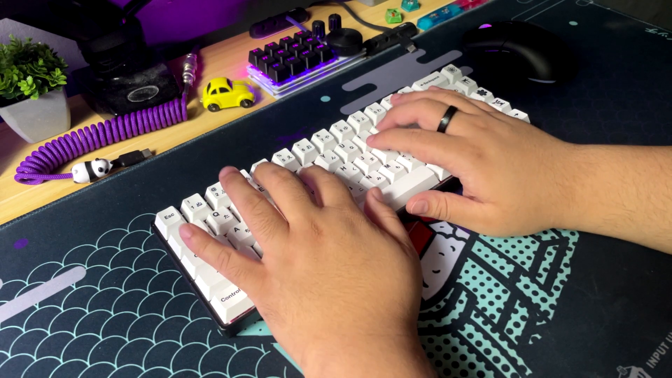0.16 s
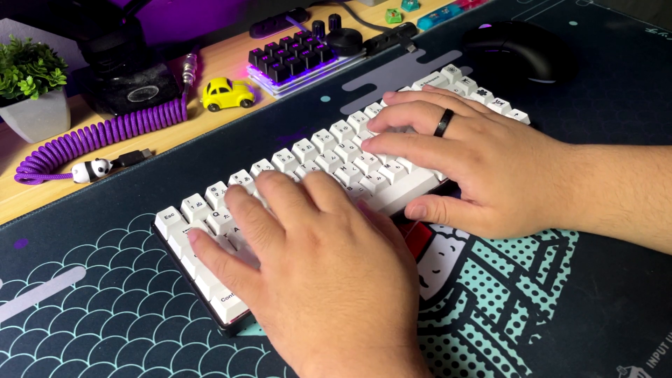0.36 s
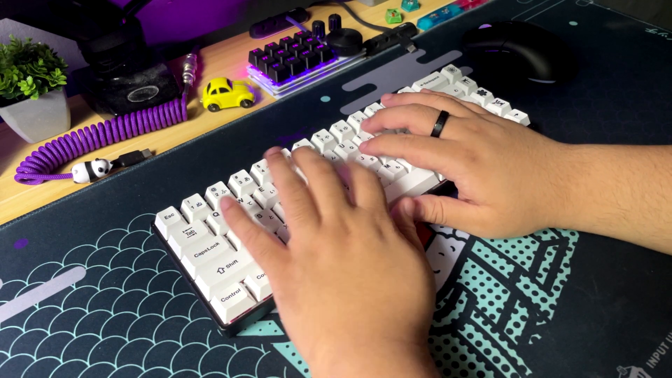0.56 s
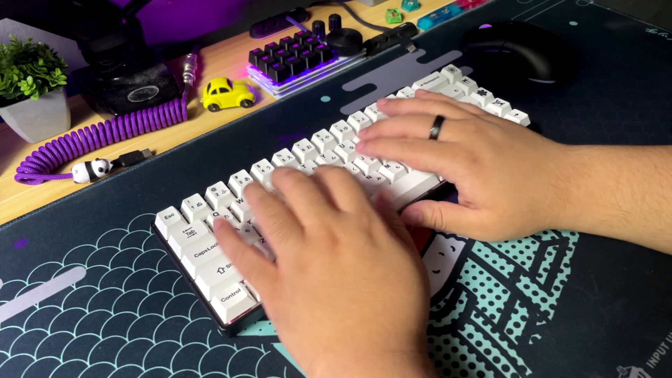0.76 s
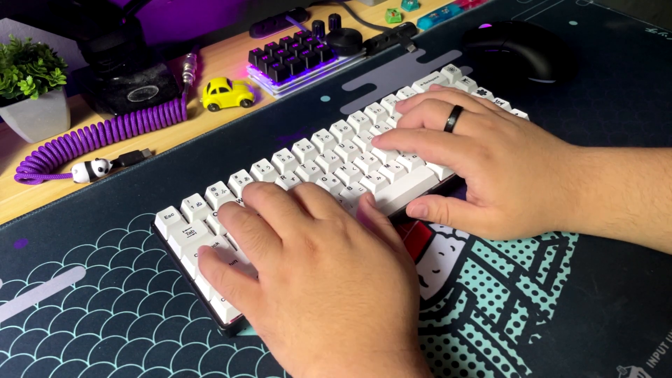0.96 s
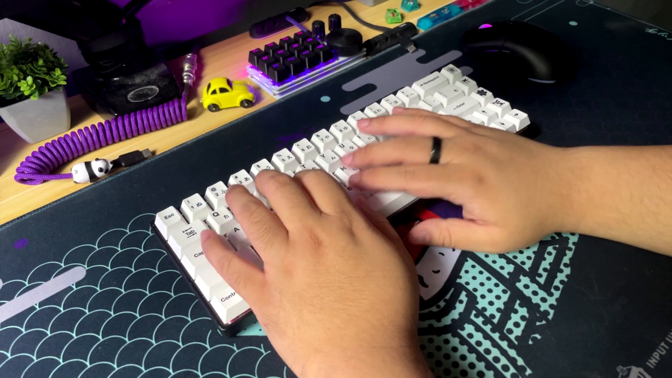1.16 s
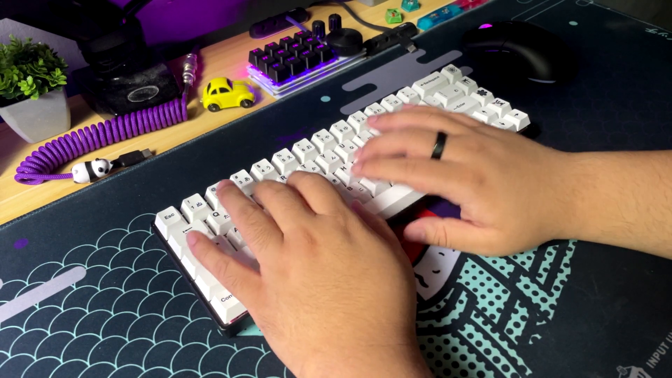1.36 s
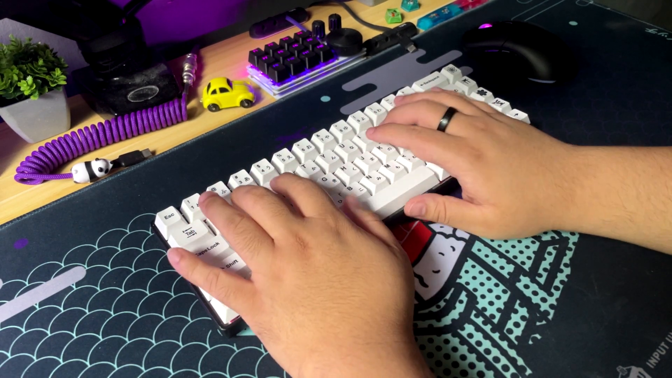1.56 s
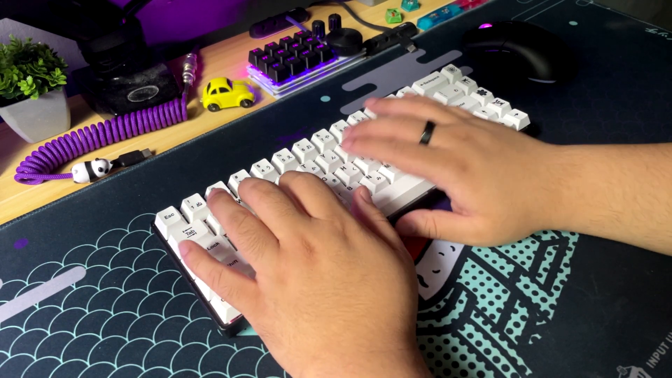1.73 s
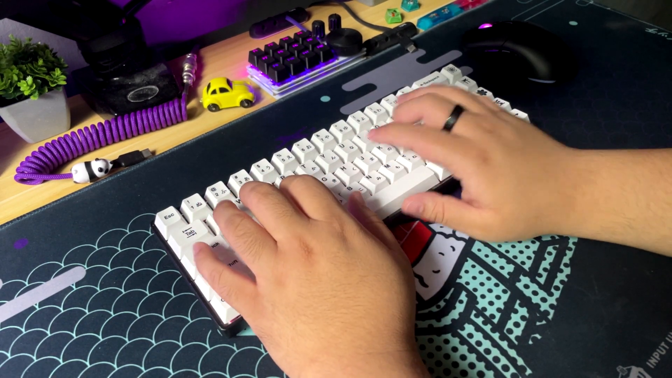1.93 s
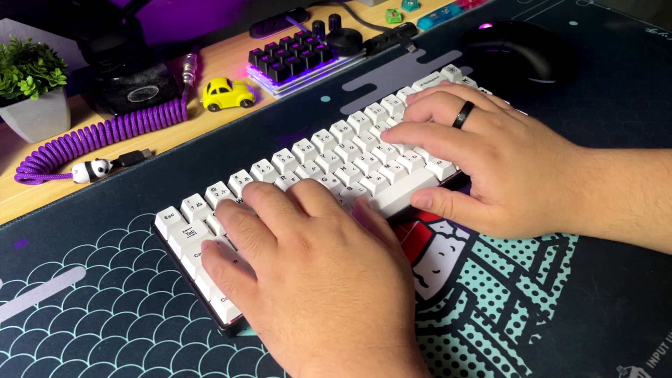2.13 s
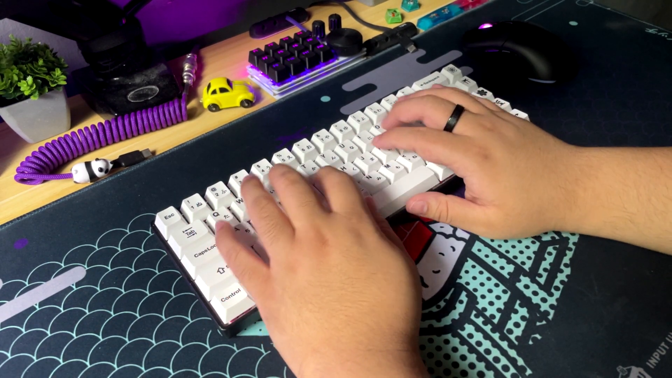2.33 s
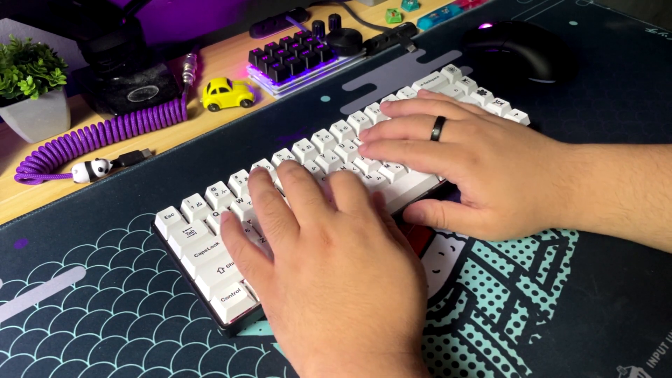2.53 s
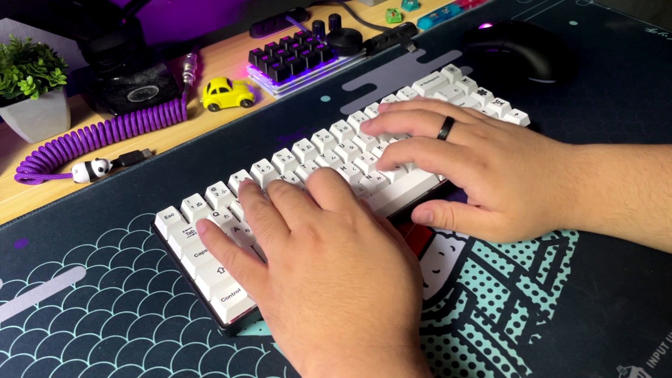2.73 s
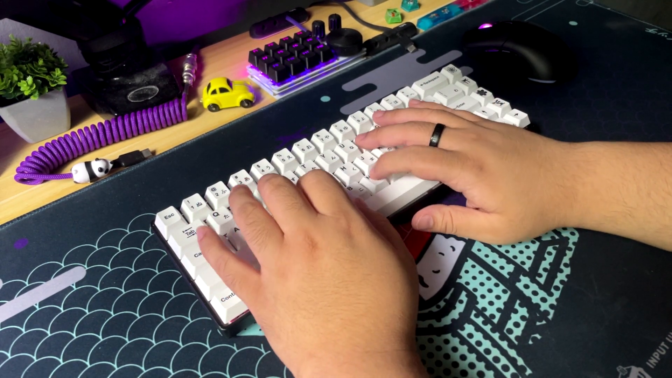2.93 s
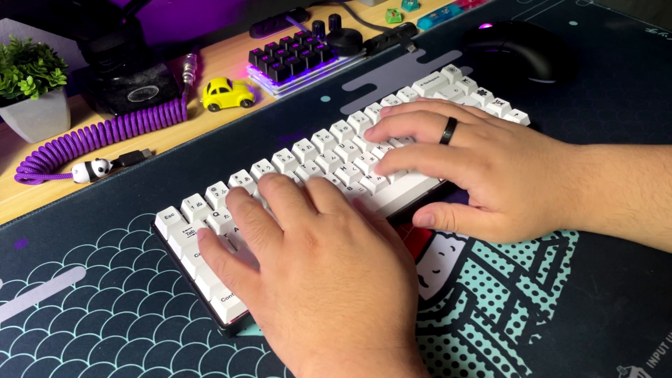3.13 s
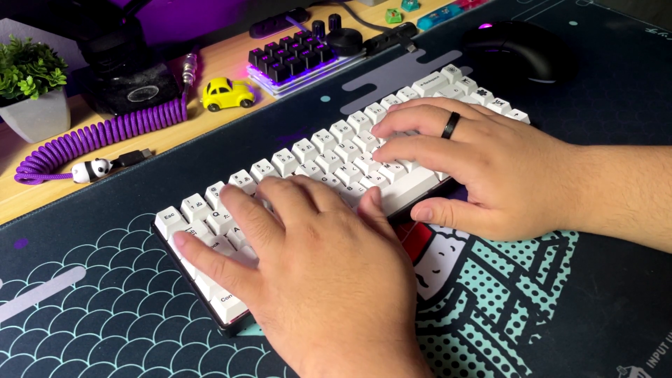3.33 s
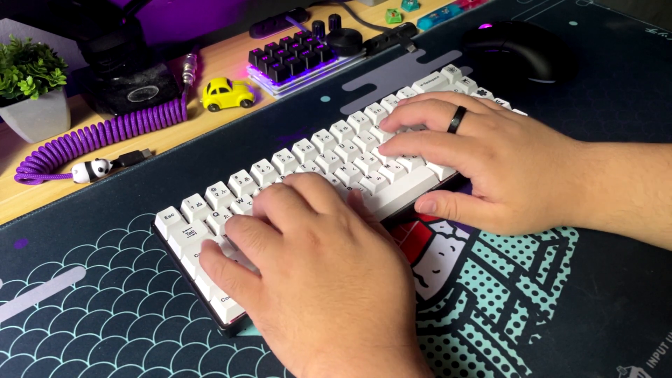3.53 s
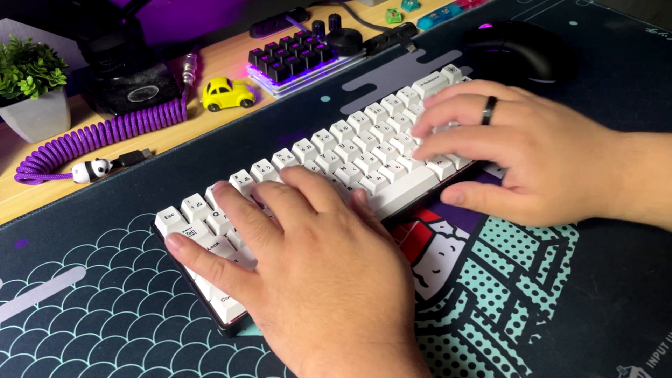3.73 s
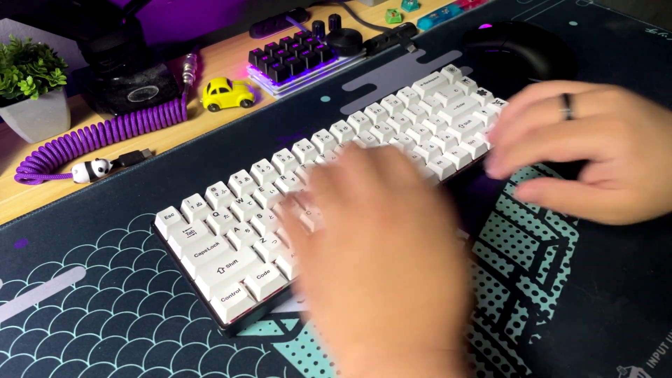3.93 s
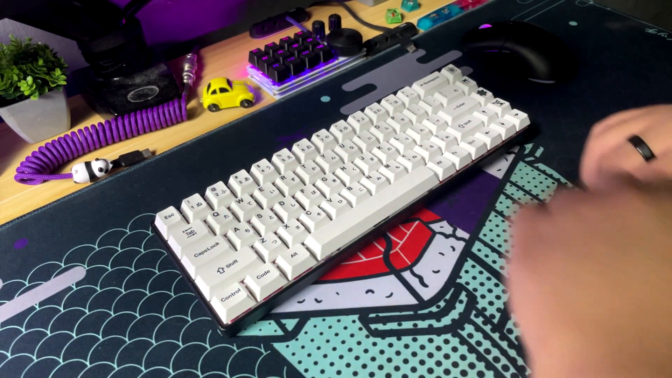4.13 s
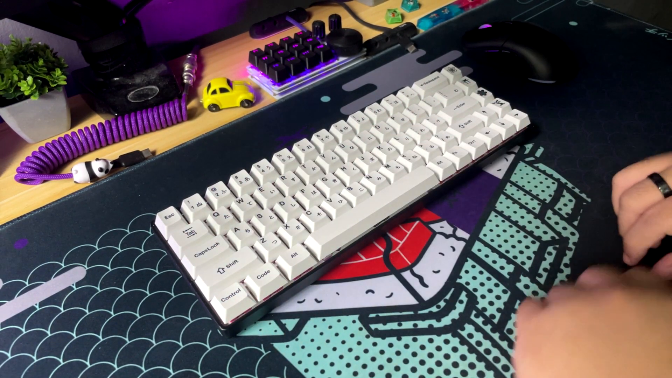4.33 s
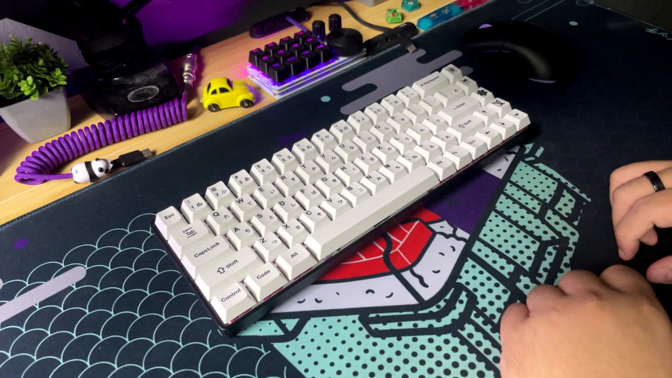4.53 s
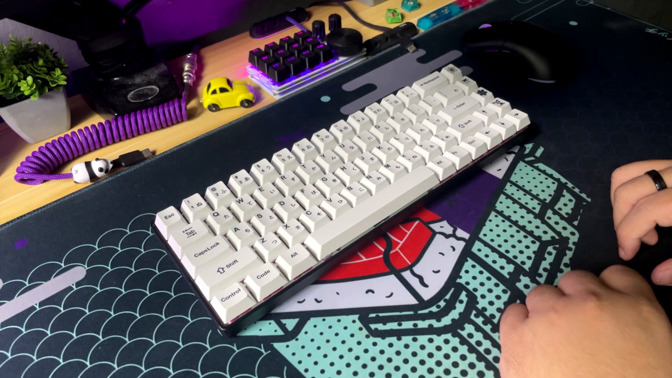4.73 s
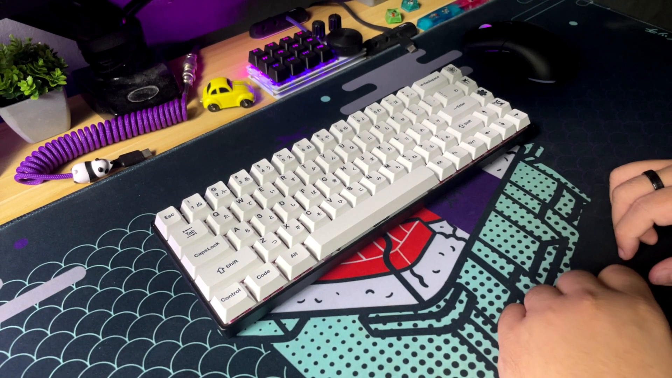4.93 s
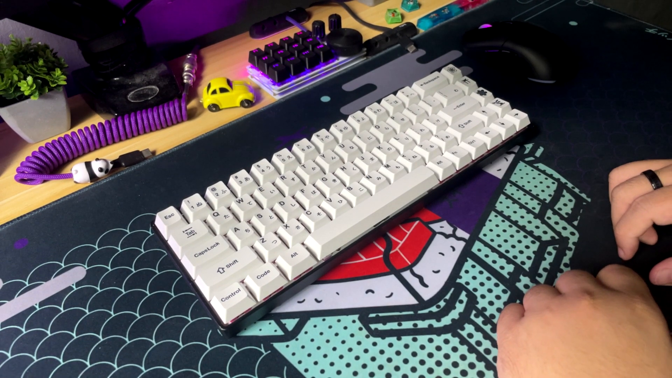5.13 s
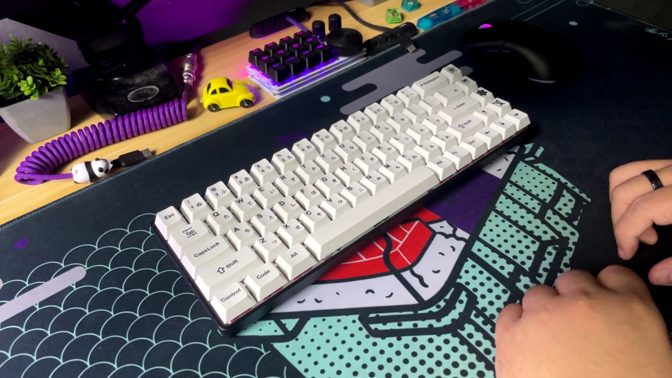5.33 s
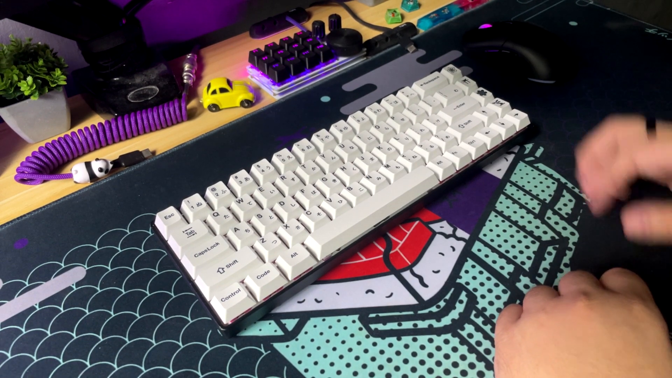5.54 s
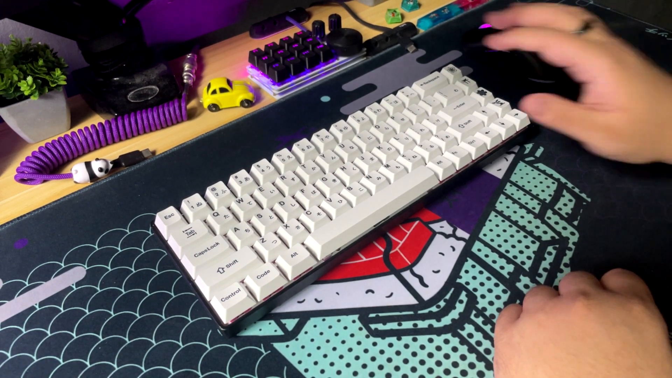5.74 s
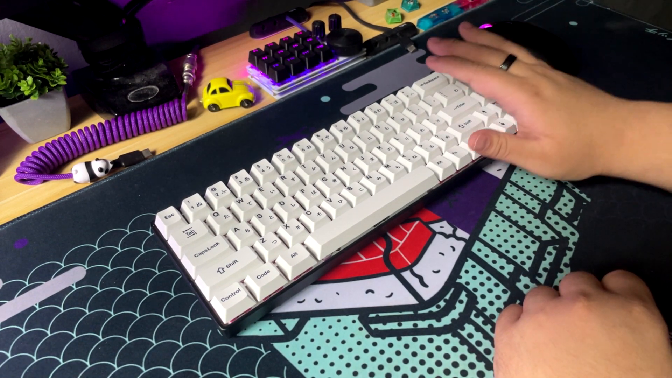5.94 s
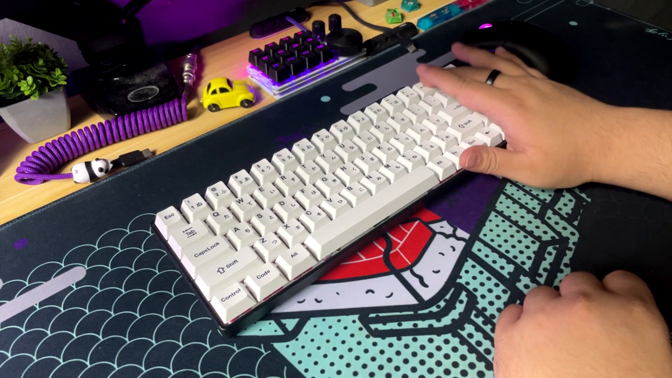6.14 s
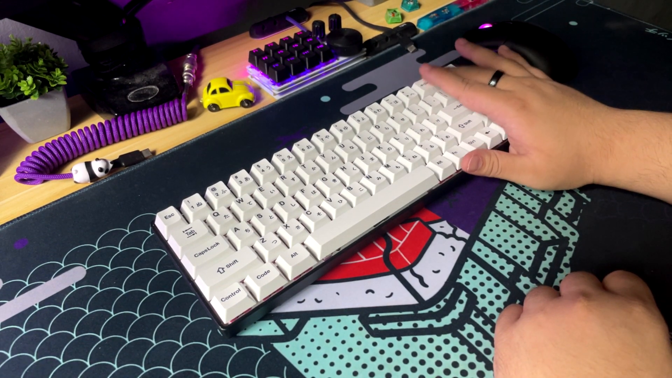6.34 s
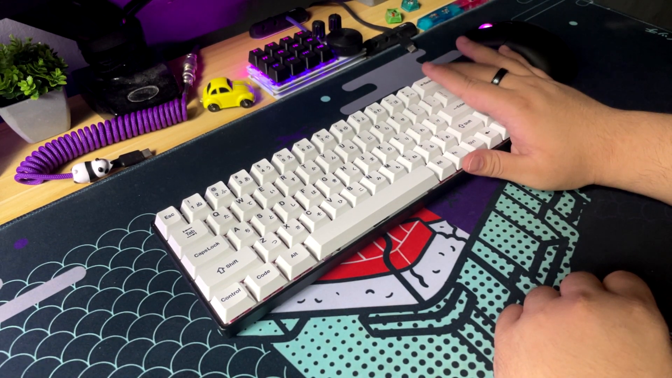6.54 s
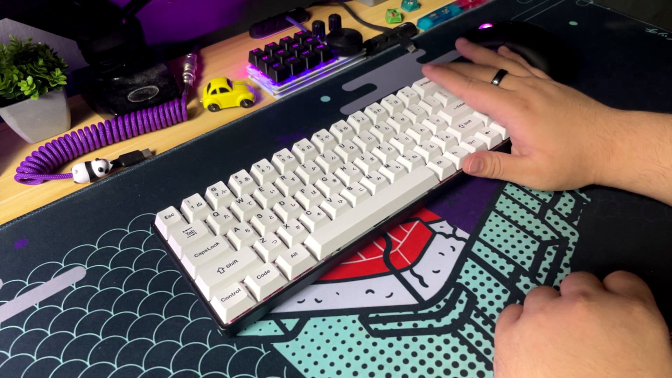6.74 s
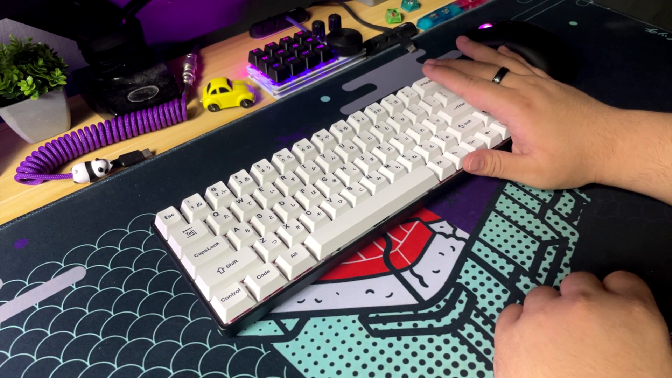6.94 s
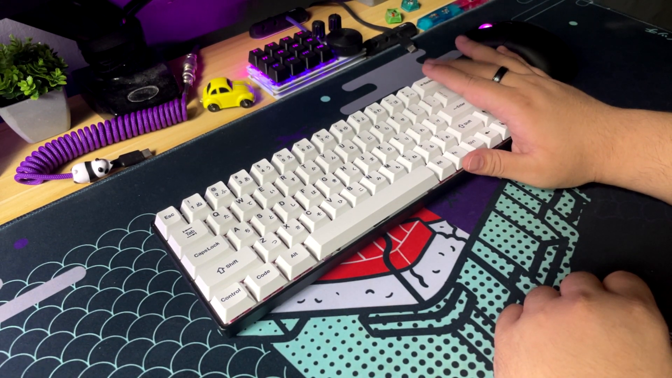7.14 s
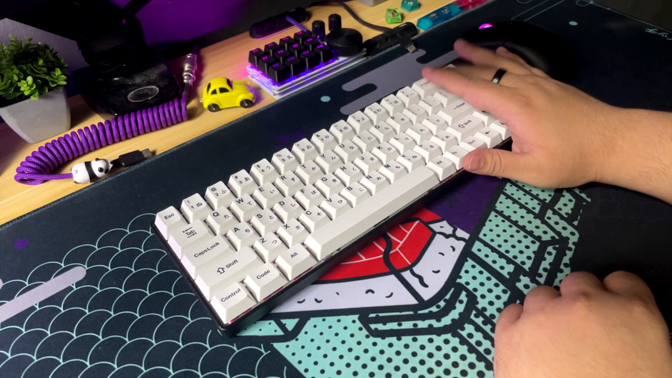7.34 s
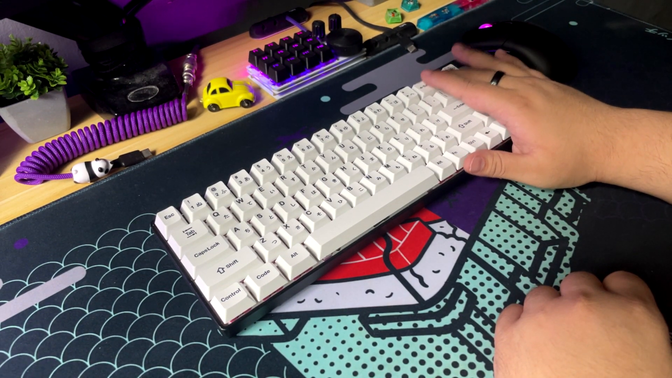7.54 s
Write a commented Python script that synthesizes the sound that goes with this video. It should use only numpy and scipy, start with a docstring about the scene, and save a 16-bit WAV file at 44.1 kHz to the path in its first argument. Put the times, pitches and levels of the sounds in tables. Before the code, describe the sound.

Muted mechanical keyboard clacks run quickly, stop with a soft desk thud, and after a pause a single key taps steadily.

```python
"""Typing on a damped mechanical keyboard

Fast typing on a keyboard that lies on a desk mat in a small quiet room. Each stroke is an impact that
excites the damped modes of plate, keycap and switch stem; its force also drives the low modes of the
desk, most strongly under the space bar. The forearms come down on the desk, all is still, and then one
finger taps backspace nine times."""
import sys
import numpy as np
from scipy import signal
from scipy.io import wavfile

SR = 44100
rng = np.random.default_rng(int(sys.argv[2]) if len(sys.argv) > 2 else 0)


def unload_wav(signal):
    """Save mono or channel-first audio to the path in sys.argv[1] as 16-bit WAV at rate SR, clipped to [-1, 1]."""
    wavfile.write(
        sys.argv[1],
        SR,
        np.round(np.clip(np.atleast_2d(signal).T, -1, 1) * 32767).astype(np.int16),
    )


N = 339129
RING_TIME = np.arange(SR // 2) / SR
FIRM_DB = -11.5   # reference force: that of a firm stroke

# Modes of a keycap. Each row: multiple of the cap's pitch, level in dB, t60 in seconds.
CAP_MODES = [(1, -1.5, 0.0086), (1.17, 2, 0.0068), (1.45, -2.5, 0.0041), (1.72, -6.5, 0.006),
             (1.97, -18.5, 0.007)]
# Modes of a switch stem. Each row: frequency in Hz, level in dB, t60 in seconds.
STEM_MODES = [(4900, -11.5, 0.0088), (6700, -15, 0.0034), (10130, -1.5, .006), (10615, -5, 0.0099)]
# Letter keys landing. Each row: start in seconds, force in dB, pitch of the plate under the key in Hz.
KEY_PRESSES = [(.0671, -21, 1070), (0.2754, -20.5, 1020), (0.5968, -17.5, 800), (.795, -19.5, 1175),
               (0.8643, -23.5, 1045), (0.9845, -24.5, 845), (1.1133, -19.5, 776), (1.1766, -14, 790),
               (1.2871, -27, 820), (1.366, -17, 843), (1.4829, -18.5, 1080), (1.5139, -27, 853),
               (1.6922, -22.5, 820), (1.8936, -18, 1172), (1.9966, -20.5, 1060), (2.3109, -17.5, 1135),
               (2.3753, -13, 795), (2.4864, -28.5, 745), (2.5219, -26, 905), (2.5832, -22.5, 830),
               (2.6077, -32, 1000), (2.809, -24, 840), (2.87, -19.5, 895), (3.2301, -15.5, 802),
               (3.3605, -17, 870), (3.4408, -22.5, 822), (3.5476, -19, 924), (3.621, -13.5, 802)]
# Letter keys springing back. Each row: start in seconds, force in dB.
KEY_RETURNS = [(.254, -30), (0.378, -26), (.686, -31.5), (.897, -33.5), (1.0552, -30), (1.233, -30.5),
               (1.5786, -34), (1.775, -31), (1.9883, -31), (2.117, -32), (2.174, -41.5), (2.4029, -30.5),
               (2.5126, -33), (2.545, -33), (2.6566, -36.5), (2.7215, -34.5), (2.961, -26.5),
               (3.0278, -35.5), (3.0506, -25), (3.3386, -24.5), (3.5125, -25), (3.694, -28.5)]
# The space bar landing under the thumb, and once springing back with almost no thump.
# Each row: start in seconds, force in dB, level of the desk thump in dB.
SPACE_STROKES = [(0.1526, -30.5, -19.5), (0.4896, -32.5, -42.5), (0.9443, -30.5, -22), (1.2639, -29, -24.5),
                 (2.0587, -35, -27), (2.6851, -30, -19.5)]
# Backspace taps. Each row: start in seconds, force in dB, hold in seconds, force of the return in dB.
BACKSPACE_TAPS = [(5.9686, -19, 0.1, -27.5), (6.1656, -23, .0831, -27.5), (6.3473, -24.5, 0.08, -26),
                  (6.5275, -24, .0875, -31), (6.708, -27.5, .079, -29), (6.8909, -25.5, 0.084, -28.5),
                  (7.077, -25.5, 0.085, -25.5), (7.2574, -24.5, .0832, -28), (7.4436, -25.5, 0.088, -32)]


def from_db(db):
    """Amplitude grows tenfold for every 20 dB."""
    return 10 ** (np.asarray(db) / 20)


def at_hz(points, hz):
    """Interpolation of a curve on a logarithmic frequency axis."""
    points = np.array(points)
    return np.interp(np.log(hz), np.log(points[:, 0]), points[:, 1])


def cut(x, hz, kind):
    """A maximally flat low-, high- or band-pass filter with skirts of 12 dB per octave."""
    sections = signal.butter(2, np.clip(hz, 10, SR * 9 / 20), kind, fs=SR, output="sos")
    return signal.sosfilt(sections, x)


def add(track, start_s, sound):
    """Superposition: a sound adds to the track from its start on."""
    start = max(round(start_s * SR), 0)
    track[start:start + len(sound)] += sound[:N - start]


def decay(t, t60):
    """Exponential damping: the level falls 60 dB in t60 seconds."""
    return np.exp(-np.log(1000) * t / t60)


def noise_bands(size):
    """Half-octave bands of noise as (centre in Hz, samples); neighbours are uncorrelated."""
    edges = 22 * 2 ** (np.arange(20) / 2)
    white = rng.standard_normal((2, size))
    return [(np.sqrt(low * high), cut(white[k % 2], [low, high], "band"))
            for k, (low, high) in enumerate(zip(edges, edges[1:]))]


def coloured_noise(spectrum):
    """Weighted bands sum to stationary noise of the given spectrum and unit rms."""
    noise = sum(from_db(at_hz(spectrum, hz)) * band for hz, band in noise_bands(N))
    return noise / noise.std()


def wavering(depth_db, per_s):
    """Random amplitude modulation: a gain that wanders about 1."""
    steps = rng.standard_normal(2000)
    return from_db(depth_db * np.interp(np.arange(N) / SR * per_s, np.arange(len(steps)), steps))


def ring(modes, pitch=1, spread_db=1, size=4000):
    """Free vibration is a sum of damped modes; each blow shares its force among them differently."""
    hz, db, t60 = np.array(modes, float).T[:, :, None]
    t = RING_TIME[:size]
    strength = from_db(db + spread_db * rng.standard_normal(db.shape))
    return np.sum(strength * decay(t, t60) * np.sin(2 * np.pi * hz * pitch * t), axis=0)


def thump(modes, push_s):
    """Gradual excitation: heavy modes swell while flesh presses on, then ring out."""
    return ring(modes, spread_db=2.5, size=len(RING_TIME)) * (1 - np.exp(-RING_TIME / push_s))


def contact(x, hardness_hz):
    """A contact of finite duration spreads the blow and so acts as a low-pass, 3 dB down at hardness_hz."""
    t = np.arange(-24, 25) / SR
    force = np.exp(-2 * (np.pi * hardness_hz * t) ** 2 / np.log(2))
    return np.convolve(x, force / force.sum(), "same")


def rattle(x, level_db, span_s, bounces=5):
    """Inelastic bounces of a loose part repeat the blow, on average ever more weakly."""
    fractions = rng.uniform(.15, 1, bounces)
    gains = from_db(level_db) * rng.standard_normal(bounces) * (1 - fractions)
    out = x.copy()
    for fraction, gain in zip(fractions, gains):
        lag = 1 + int(fraction * span_s * SR)
        out[lag:] += gain * x[:-lag]
    return out


def room_tone(level_db=-70):
    """The background of a quiet room is stationary noise, weighted to low frequencies."""
    # Each row: frequency in Hz, relative spectral density in dB.
    spectrum = [(25, -10.5), (60, -9), (130, 0.5), (250, -2), (450, -0.5), (700, -13), (1000, -8),
                (1600, -17), (2400, -39.5), (4000, -40), (16000, -52.5)]
    return from_db(level_db) * coloured_noise(spectrum)


def hands(lead_s=.02, swell_s=0.038):
    """Fingers rock the case (rumble) and rub the caps (rustle); incoherent noises add in power."""
    # Spectra of the two noises. Each row: frequency in Hz, relative spectral density in dB.
    rumble_spectrum = [(25, -9), (48, -9), (68, 4.5), (90, -2), (180, 2.5), (300, -13.5), (450, -8),
                       (700, -16.5), (1500, -61)]
    rustle_spectrum = [(300, -10), (700, 5), (1300, 8.5), (2300, -15.5), (4000, -18), (7000, -33.5),
                       (10500, -28), (15000, -47)]
    # The fading tail of a keystroke at the very start; then hands leaving the keys, settling on the mat
    # and reaching back. Each row: middle in seconds, length in seconds, rumble in dB, rustle in dB.
    swells = [(-0.011, 0.14, -37, -36), (3.633, 0.95, -49, -69.5), (4.035, 0.23, -67.5, -73),
              (4.458, 0.61, -65.5, -75), (4.856, 0.87, -79, -74), (5.405, 0.43, -63.5, -77.5),
              (5.891, 0.26, -59.5, -83)]
    finger_power, t = np.zeros(N), np.arange(N) / SR
    stroke_swell = RING_TIME / swell_s * np.exp(1 - RING_TIME / swell_s)
    for start_s, *_ in KEY_PRESSES + KEY_RETURNS + SPACE_STROKES + BACKSPACE_TAPS:
        add(finger_power, start_s - lead_s, stroke_swell)
    rumble = from_db(-53.5) * np.sqrt(finger_power)
    rustle = from_db(-57.5) * np.sqrt(finger_power)
    for middle_s, length_s, rumble_db, rustle_db in swells:
        swell = np.cos(np.pi * np.clip((t - middle_s) / length_s, -.5, .5)) ** 2
        rumble = np.hypot(rumble, from_db(rumble_db) * swell)
        rustle = np.hypot(rustle, from_db(rustle_db) * swell)
    rumble *= wavering(depth_db=1.5, per_s=25) * coloured_noise(rumble_spectrum)
    rustle *= wavering(depth_db=2.5, per_s=22) * coloured_noise(rustle_spectrum)
    return rumble + rustle


def touches(cap_hz=2157, travel_s=.014, touch_db=-27.5):
    """Light impacts: a finger meets the loose cap before the key lands; at times a stem ticks alone."""
    # Half-pressed switches letting go. Each row: start in seconds, level in dB.
    stem_ticks = [(.779, -52), (2.564, -46), (3.135, -47.5), (3.152, -41.5)]
    out = np.zeros(N)
    for landing_s, force_db, _ in KEY_PRESSES:
        tick = contact(ring(CAP_MODES, cap_hz * rng.uniform(0.92, 1.25)), hardness_hz=4500)
        start_s = landing_s - travel_s * rng.uniform(.5, 2.7)
        add(out, start_s, from_db(force_db + touch_db) * rattle(tick, level_db=-0.5, span_s=0.0059))
    for start_s, db in stem_ticks:
        add(out, start_s, from_db(db) * rattle(ring(STEM_MODES), level_db=-1, span_s=0.0043))
    return out


def key_stroke(force_db, plate_hz, cap_hz, snap_db=0):
    """One impact excites plate, cap and stem; each grows with the force by its own power law."""
    # Each row: multiple of the plate's pitch under the key, level in dB, t60 in seconds.
    plate_modes = [(.83, 4.5, 0.027), (1, 7.5, 0.019), (1.34, 2.5, 0.021), (1.76, -10, 0.034)]
    over_db = force_db - FIRM_DB
    stiffness_db = -9.5 * np.log2(plate_hz / 868)   # a stiffer spot rings higher and moves less
    plate_db = -20 + 0.75 * over_db + stiffness_db
    stem_db = -23.5 + 1.35 * over_db + snap_db   # the snap grows faster than the force
    # A gentle blow squashes the pad less, lasts longer and sounds duller.
    firmness = from_db(0.22 * min(over_db + 6.5, 0))
    own_cap_hz = cap_hz * (1 + .045 * rng.standard_normal())
    plate = from_db(plate_db) * contact(ring(plate_modes, plate_hz), hardness_hz=2400)
    cap = from_db(force_db) * contact(ring(CAP_MODES, own_cap_hz), hardness_hz=4200 * firmness)
    stem = from_db(stem_db) * contact(ring(STEM_MODES, spread_db=4.5), hardness_hz=11400)
    return plate + rattle(cap + stem, level_db=-2.0, span_s=.0035)


def letter_keys(return_plate_hz=890, plate_spread=0.21):
    """A key strikes at both ends of its travel; on the return the cap rings lower, the stem snaps less."""
    out = np.zeros(N)
    for start_s, force_db, plate_hz in KEY_PRESSES:
        add(out, start_s, key_stroke(force_db, plate_hz, cap_hz=2157))
    for start_s, force_db in KEY_RETURNS:
        plate_hz = return_plate_hz * (1 + plate_spread * rng.standard_normal())
        add(out, start_s, key_stroke(force_db, plate_hz, cap_hz=1770, snap_db=-12.5))
    return out


def desk(follow_through_s=.016):
    """Structure-borne sound: the force of each press passes through case and mat into the desk."""
    # Desk modes under the keyboard's middle and under its corner.
    # Each row: frequency in Hz, level in dB, t60 in seconds.
    middle_modes = [(69, -8.5, 0.2), (114, -9, 0.087), (183, -1, 0.12), (287, -25, 0.53), (382, -15, 0.094),
                    (449.4, -14.5, 0.11)]
    corner_modes = [(68.4, -6.5, 0.33), (129, -8.5, 0.17), (195, 5, 0.062), (246, -4.5, 0.16),
                    (336, -14.5, .15), (405, -13, 0.11)]
    out = np.zeros(N)
    for click_s, force_db, _ in KEY_PRESSES:   # the finger's weight arrives after the click
        weight = from_db(-31 + .5 * (force_db - FIRM_DB))
        add(out, click_s + follow_through_s, weight * thump(middle_modes, push_s=0.025))
    for start_s, _, thump_db in SPACE_STROKES:
        add(out, start_s, from_db(thump_db + 1) * thump(middle_modes, push_s=0.0085))
    for start_s, *_ in BACKSPACE_TAPS:
        add(out, start_s, from_db(-34.5) * thump(corner_modes, push_s=0.002))
    return out


def wide_key(strokes, modes, pad_hz, wire_db, wire_s, spread_db=.5):
    """A stabilised key rings in the same modes each time; soft contact dulls it and its wire chatters."""
    out = np.zeros(N)
    for start_s, force_db, hardness_hz in strokes:
        padded = contact(ring(modes, spread_db=spread_db), pad_hz)
        blow = cut(padded, hardness_hz, "low")
        add(out, start_s, from_db(force_db) * rattle(blow, wire_db, wire_s))
    return out


def space_bar(hardness_hz=13000):
    """The impact of the long bar excites its modes and sets its wire bouncing."""
    # Each row: frequency in Hz, level in dB, t60 in seconds.
    bar_modes = [(445, 0.5, 0.024), (654, 9, .018), (770, -0.5, 0.031), (1220, -0.5, 0.024),
                 (2280, 7.5, 0.0035), (2600, -2, 0.0097), (3530, -11, .008), (4600, 0.5, 0.0062),
                 (5320, -2.5, 0.014), (7560, -3.5, 0.0057), (10000, 1, 0.0026)]
    strokes = [(start_s, force_db, hardness_hz) for start_s, force_db, _ in SPACE_STROKES]
    return wide_key(strokes, bar_modes, pad_hz=10000, wire_db=-1, wire_s=.006, spread_db=2.5)


def fingertips(count=16):
    """Mechanical play: caps nudged during the typing rattle on their stems without going down."""
    out = np.zeros(N)
    typing_end_s = KEY_RETURNS[-1][0]
    for moment, force, pitch in rng.random((count, 3)):
        tick = contact(ring(CAP_MODES, 1700 + 1100 * pitch), hardness_hz=4480)
        wobble = rattle(tick, level_db=0.0, span_s=0.0074)
        add(out, moment * typing_end_s, from_db(-48 + 2.7 * force) * wobble)
    return out


def forearms(skid_s=0.022, settle_s=0.095, settle_db=-16):
    """A soft, heavy impact drives the desk's low modes; skin makes friction noise as it skids to rest."""
    # Arms and wrists landing. Each row: start in seconds, thump in dB, brushing in dB.
    landings = [(4.21, -45, -70), (4.245, -30.5, -42.5), (5.73, -57, -84)]
    # Modes of the desk edge. Each row: frequency in Hz, level in dB, t60 in seconds.
    edge_modes = [(33.3, -8, 0.5), (119.6, 7.5, 0.16), (150.8, 12.5, 0.13), (284, -12, 0.3),
                  (425, -23, 0.5)]
    # Skin brushing the edge. Each row: frequency in Hz, relative spectral density in dB.
    brush_spectrum = [(300, -2.5), (850, -14.5), (1450, 11), (2000, -15.5), (2800, -30), (5000, -53),
                      (9000, -56), (15000, -69)]
    thumps, friction = np.zeros(N), np.zeros(N)
    skid = np.exp(-RING_TIME / skid_s) + from_db(settle_db) * np.exp(-RING_TIME / settle_s)
    onset = 1 - np.exp(-RING_TIME / 0.00076)
    for start_s, thump_db, brush_db in landings:
        add(thumps, start_s, from_db(thump_db) * thump(edge_modes, push_s=0.012))
        add(friction, start_s, from_db(brush_db) * skid * onset)
    return thumps + friction * coloured_noise(brush_spectrum)


def hand_lift(start_s=5.3, length_s=0.2, level_db=-66):
    """Sliding friction makes a faint band of noise as the right hand leaves the mat."""
    swell = np.sin(np.pi * np.clip((np.arange(N) / SR - start_s) / length_s, 0, 1)) ** 2
    swish = cut(rng.standard_normal(N), [2400, 4200], "band")
    return from_db(level_db) * swell * wavering(depth_db=1.5, per_s=150) * swish / swish.std()


def backspace():
    """Each tap makes two impacts: the key lands, is held a moment and springs back."""
    # Modes on landing and on return. Each row: frequency in Hz, level in dB, t60 in seconds.
    landing_modes = [(777, 7, 0.04), (907, 11.5, 0.019), (1216, 6.5, 0.019), (1410, 3, 0.021),
                     (1630, 6, 0.018), (1975, 8, 0.018), (2260, 1.5, 0.01), (2990, 13, 0.0031),
                     (3476, -2.5, 0.014), (3774, 3.5, 0.0068), (4270, 0.5, .011), (4570, 7.5, 0.0056),
                     (4840, -6, 0.014), (5290, 5.5, 0.01), (8550, 9.5, 0.0042), (9760, 1.5, 0.0092)]
    return_modes = [(736, 5.5, 0.032), (938, 6.5, 0.021), (1297, -14, 0.066), (2034, 6.5, 0.007),
                    (2220, -9.5, 0.005), (3130, -16, 0.022), (4020, -2.5, 0.0067), (5150, -8.5, 0.025),
                    (8600, -6, 0.016)]

    def hardness_hz(force_db, usual_db=-21.5):
        """Bandwidth follows a power of the force: firmer blows are brighter."""
        return 7200 * from_db(0.57 * (force_db - usual_db))

    landings = [(start_s, db, hardness_hz(db)) for start_s, db, _, _ in BACKSPACE_TAPS]
    returns = [(start_s + held_s, db, hardness_hz(db)) for start_s, _, held_s, db in BACKSPACE_TAPS]
    down = wide_key(landings, landing_modes, pad_hz=6330, wire_db=-7.5, wire_s=0.00297)
    up = wide_key(returns, return_modes, pad_hz=3970, wire_db=-6, wire_s=0.00402)
    return down + up


def case_foam(x, edge_hz=11500, leak_db=-11):
    """Absorption: the foam in the case soaks up nearly everything above the snap of the stems."""
    damped = signal.sosfilt(signal.cheby1(6, 1, edge_hz, fs=SR, output="sos"), x)
    return damped + from_db(leak_db) * cut(x, edge_hz, "low")


def nearby_scatter(x, level_db, t60, delay_s):
    """Early reflections: hands, desk and the things on it throw back a short spray of echoes."""
    t = RING_TIME[:4000]
    onset = 1 - np.exp(-(t / delay_s) ** 4)
    spray = rng.standard_normal(len(t)) * decay(t, t60) * onset
    return from_db(level_db) * signal.fftconvolve(x, spray / np.linalg.norm(spray))[:N]


def room(x, level_db, build_s):
    """Reverberation: a diffuse field builds up quickly and dies away sooner in the treble."""
    # Each row: frequency in Hz, relative spectral density at the start of the tail in dB.
    tail_spectrum = [(100, 3.5), (400, 3), (900, -9), (2000, -6.5), (4000, -9), (8000, -4.5), (15000, -3.5)]
    # Each row: frequency in Hz, t60 in seconds.
    decay_times = [(100, 0.77), (1000, 0.65), (4000, .35), (12000, 0.3)]
    tail = sum(from_db(at_hz(tail_spectrum, hz)) * band * decay(RING_TIME, at_hz(decay_times, hz))
               for hz, band in noise_bands(len(RING_TIME)))
    tail *= 1 - np.exp(-(RING_TIME / build_s) ** 2)
    return from_db(level_db) * signal.fftconvolve(x, tail / np.linalg.norm(tail))[:N]


def scene():
    """The direct sound of keyboard, desk and hands superposes with reflections and the room tone."""
    typing = letter_keys() + touches() + fingertips() + space_bar()
    # Small parts radiate little bass, least of all at the stiff corner of the case.
    corner_taps = cut(backspace(), 975, "high")
    clacks = case_foam(cut(typing + corner_taps, 960, "high"))
    clacks += nearby_scatter(clacks, level_db=-14.5, t60=0.073, delay_s=0.0037)
    direct = clacks + desk() + forearms() + hand_lift()
    background = room_tone()
    reverberation = room(direct, level_db=-19.5, build_s=0.00368)
    return (direct + reverberation + hands() + background)[None]


def record(dry, ceiling=.8, cutoff_hz=16200):
    """Soft saturation in the microphone rounds the hardest peaks; a steep low-pass limits the band."""
    rounded = ceiling * np.tanh(dry / ceiling)
    return signal.sosfilt(signal.ellip(10, .1, 80, cutoff_hz, fs=SR, output="sos"), rounded)


dry = scene()
out = record(dry)
unload_wav(out)
```